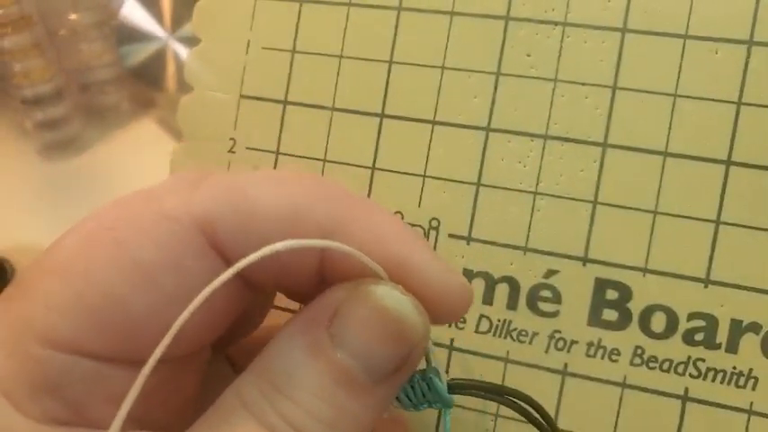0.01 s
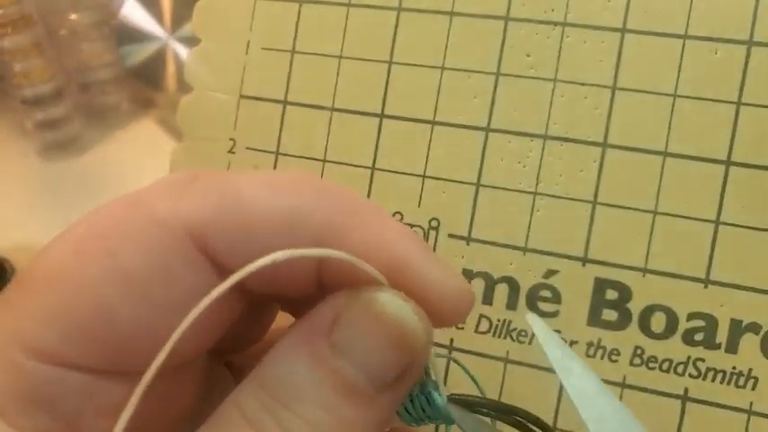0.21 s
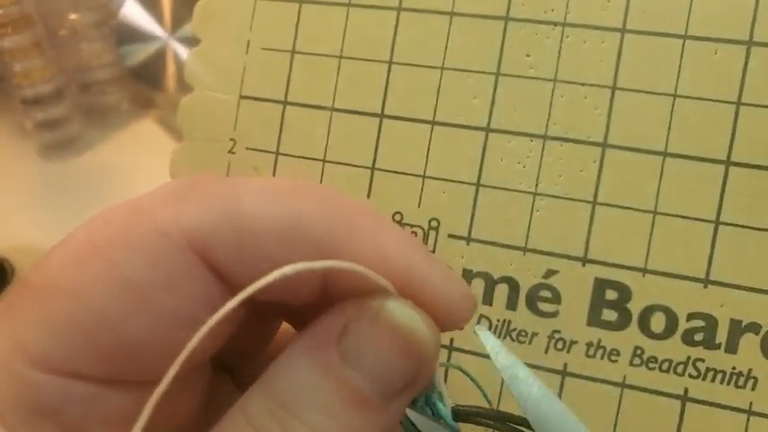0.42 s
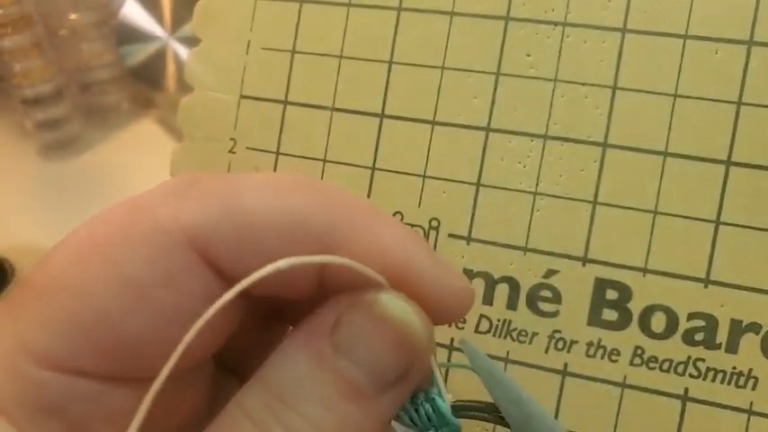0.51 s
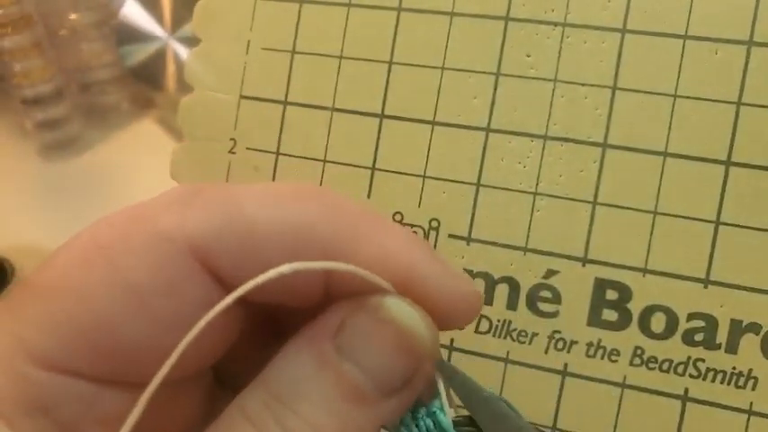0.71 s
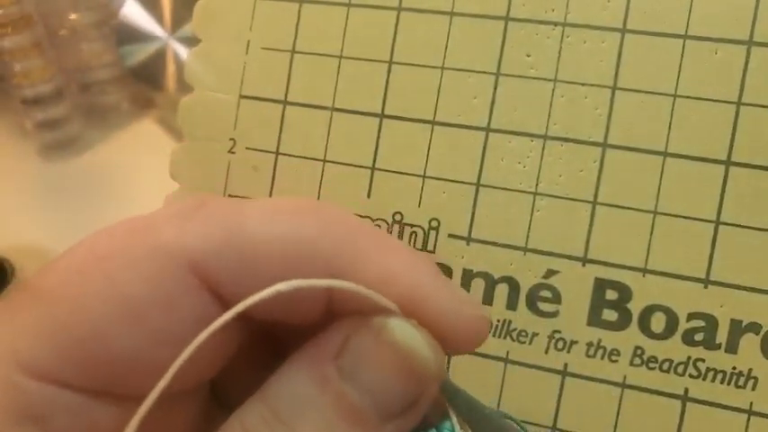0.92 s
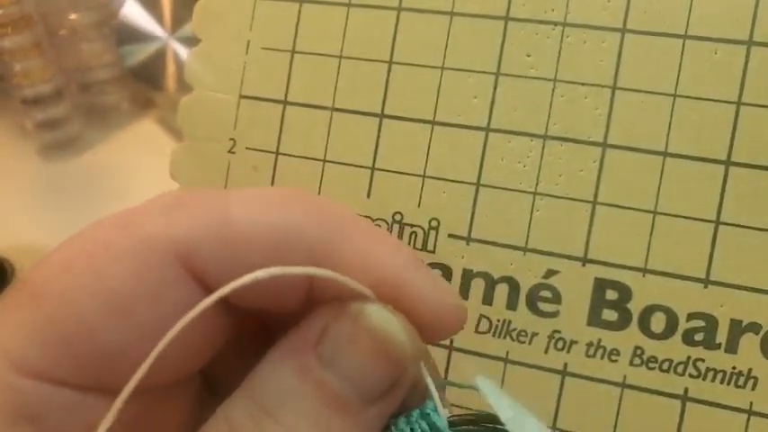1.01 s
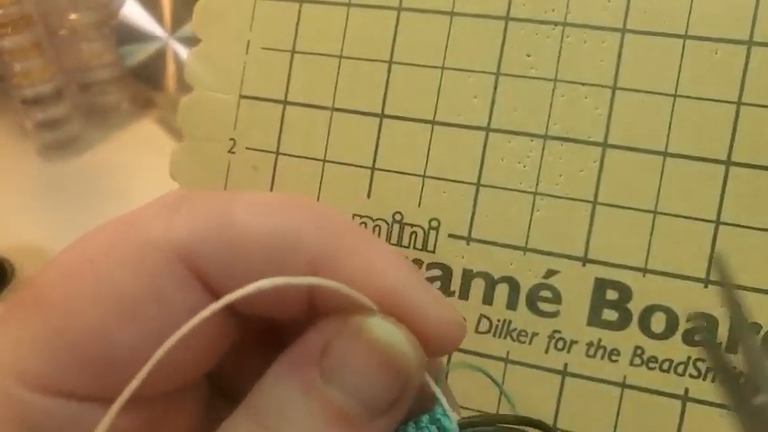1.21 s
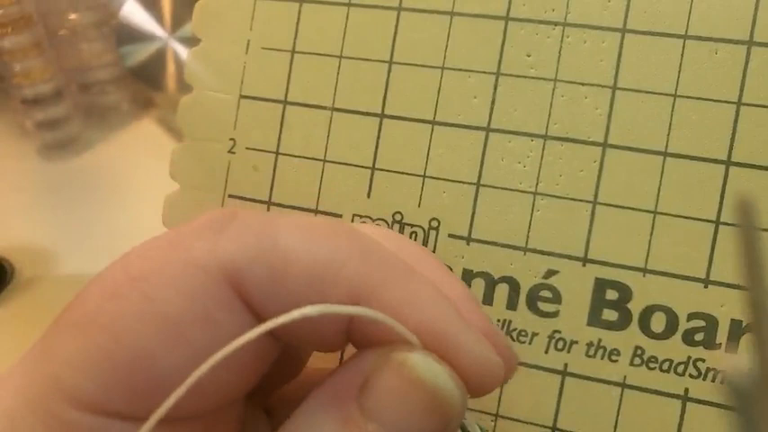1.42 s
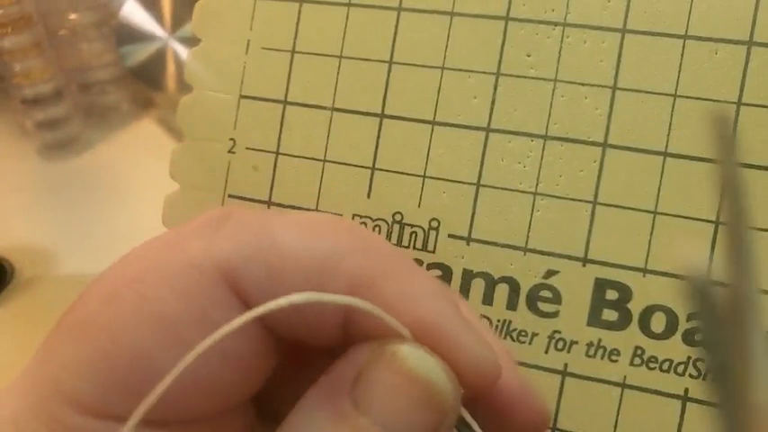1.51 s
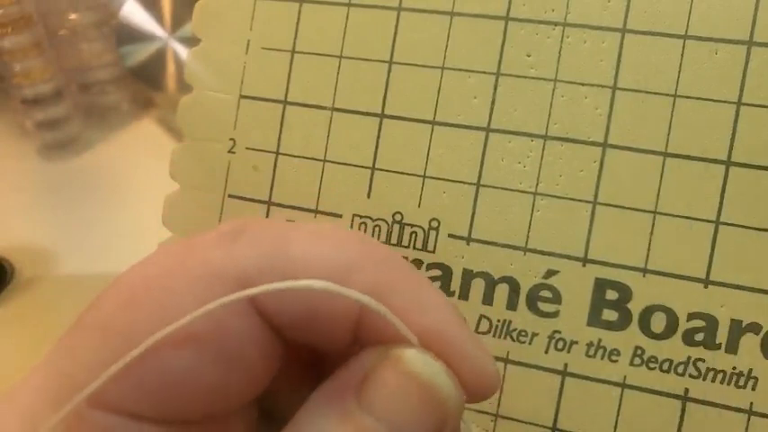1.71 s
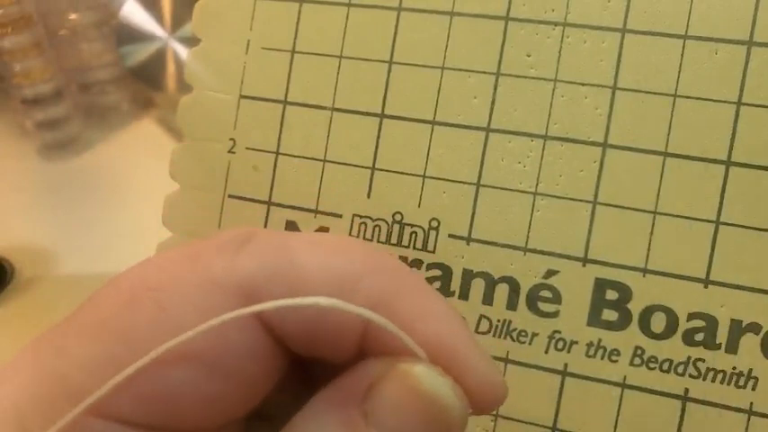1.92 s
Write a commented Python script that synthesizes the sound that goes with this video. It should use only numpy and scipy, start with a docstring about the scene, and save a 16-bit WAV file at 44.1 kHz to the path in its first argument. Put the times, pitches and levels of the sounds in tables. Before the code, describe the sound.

Small scissors snip a thread with one crisp click and a brief metallic ring. Then fingers and scissors tap lightly on a work board, and thread squeaks faintly through fingers, close to the microphone over a small room's low hum.

```python
"""Small scissors snip a thread over a macrame board: the blades rub, snap shut, ring and slide open.
Fingers and scissors tap and bump the board lightly, then the thread sticks and slips through the
fingers in a few short, squeaky rasps. The microphone is close and hisses faintly; behind the
handling, mains hum and a low rumble fill the small room."""
import sys
import numpy as np
from scipy import signal
from scipy.fft import rfft, irfft, next_fast_len
from scipy.io import wavfile

SR = 44100
rng = np.random.default_rng(int(sys.argv[2]) if len(sys.argv) > 2 else 0)


def pcm_store(signal):
    """Save signal as 16-bit PCM."""
    levels = np.round(np.clip(np.atleast_2d(signal), -1, 1) * 32767)
    wavfile.write(sys.argv[1], SR, levels.astype(np.int16).T)


N = 88200

# the blades' bright bite and closing clack, then two dull early echoes from the room:
# start_s, level_db, brightness_hz
SNIP_CRACKS = [(0.207, -30.5, 13000), (0.2086, -30, 10000), (.2107, -21.5, 3350), (0.2174, -32, 2400),
               (0.2288, -42, 2120), (0.241, -42, 2200)]
# ringing modes of the scissors: pitch_hz, level_db, t60_s, pan_db
STEEL_MODES = [(866.3, -10.5, 0.067, -16.5), (1056, -20.5, .05, 8), (1295, -20, 0.068, -1),
               (1603, -6, 0.084, -6.5), (1735, -9.5, 0.045, -9), (1968, -15, 0.074, -4.5),
               (2020, -20.5, 0.072, -1), (2223, -15.5, 0.25, -2), (2273, -5, 0.044, -13),
               (2380, -15.5, 0.065, -5), (2599, -16, .09, -4), (3131, -14, 0.11, 2.5),
               (3855, -13, 0.068, 2.5), (4700, -21, 0.11, 2.5), (5426, -29.5, 0.05, -5),
               (6630, -26.5, .05, 11.5)]
SNIP_START_S = SNIP_CRACKS[0][0]
STEEL_LOW_HZ = 799  # thin steel radiates little bass
THREAD_PAN_DB, HAND_PAN_DB = -5, -8  # left minus right
LEFT_LAG_S = .00009  # close sounds reach the left channel later


def snip():
    """The blades bite and clack shut, setting the steel ringing; the room returns two dull echoes."""
    # spectrum of a crack: frequency_hz, level_db
    crack_spectrum = [(150, -38), (370, -20.5), (560, -41.5), (720, -29.5), (900, -21), (1200, -14),
                      (1600, -5), (2150, 2.5), (2800, -7.5), (3300, -12.5), (3800, -7), (4300, -12.5),
                      (5600, -10.5), (8400, -27), (9300, -55.5), (16000, -69)]
    click_db, grit_db, ring_db = 15, -4, -24.5
    cracks = np.zeros((2, N))
    for start, db, brightness in SNIP_CRACKS:
        colour = [(f, level - 20 * np.log10(1 + (f / brightness) ** 2)) for f, level in crack_spectrum]
        click = np.pad(shortest_click(colour), (round(start * SR), 0))[:N]
        grit = struck(start, t60=.016) * coloured(white(), colour)
        cracks += amp(db) * (amp(click_db) * click + amp(grit_db) * grit)
    ring = sum(amp(db) * pan(side) * mode(hz, t60, SNIP_START_S, attack=.00067)
               for hz, db, t60, side in STEEL_MODES)
    ring = filtered(ring, lambda f: low_cut(f, STEEL_LOW_HZ))
    return left_late(pan(-8.5) * cracks) + amp(ring_db) * ring


def knock():
    """The snip jolts hand and board into a soft, low thud."""
    return amp(-58) * pan(HAND_PAN_DB) * mode(hz=366, t60=.039, start=SNIP_START_S, attack=.0016)


def blade_slides():
    """Friction between the blades softly excites the steel's modes."""
    # centre_s, half_length_s, level_db, brightness_hz
    strokes = [(0.059, 0.005, -67.5, 2110), (0.081, 0.0084, -58, 1690), (0.473, 0.015, -67.5, 1000),
               (0.536, 0.017, -72.5, 885), (0.568, 0.011, -62, 900), (0.61, 0.027, -70.5, 856),
               (0.699, 0.01, -64, 960)]
    longest_t60_s = .11  # sliding blades damp each other

    def steel(f):
        resonances = sum(
            amp(db) * pan(side) / (1 + 2j * np.pi * (f - hz) * min(t60, longest_t60_s) / np.log(1000))
            for hz, db, t60, side in STEEL_MODES)
        return low_cut(f, STEEL_LOW_HZ) * resonances

    ring = filtered(white()[0], steel)
    out = np.zeros((2, N))
    for centre, half, db, hz in strokes:
        rub = unit(filtered(ring, lambda f: focus(f, hz, octaves=.69) ** 2))
        out += amp(db) * swell(centre, half) * rub
    return out


def board_taps():
    """Soft touches ring the board with a short scuff; each loads it a little differently."""
    # start_s, level_db, centre_hz, pan_db, attack_s
    touches = [(.078, -55, 1054, -8.5, 0.0027), (.642, -51.5, 347, -12.5, 0.0011),
               (1.267, -58, 1940, 1, 0.0022), (1.272, -55, 280, -13, .002), (1.299, -55, 1970, 6, 0.0093),
               (1.328, -57.5, 1200, -8.5, 0.00074), (1.370, -57.5, 1500, -9, 0.0014),
               (1.379, -56.5, 260, -3, .002), (1.497, -60, 2250, 14, 0.0031),
               (1.573, -50.5, 1810, -6, 0.0071), (1.583, -44.5, 265, 0.5, 0.0022),
               (1.608, -52, 1370, -9.5, 0.0031), (1.626, -41.5, 1040, -9.5, 0.0019),
               (1.646, -51, 1760, -3, .003), (1.926, -51.5, 1510, -11, 0.0033)]
    # ringing modes of the board: pitch_hz, level_db, t60_s
    board_modes = [(256.3, -6, 0.096), (310, -5, 0.12), (464, -6, 0.071), (868, -5, 0.1),
                   (940, -6.5, 0.042), (1110, -2, 0.051), (1240, -9, 0.068), (1720, -0.5, 0.036),
                   (1949, -1, 0.07), (2356, -6.5, .05)]
    # frequency_hz, level_db
    scuff_spectrum = [(200, 17), (400, -10), (650, -20), (1000, -8), (2000, -10), (2700, -2), (5000, 0),
                      (9000, -15)]
    octaves, detune_share, spread_db, scuff_db = .59, .014, 2, -13.5
    hz, level, t60 = np.transpose(board_modes)
    out = np.zeros((2, N))
    for start, db, centre, side, attack in touches:
        detune, spread = rng.standard_normal((2, len(board_modes)))
        pitches = hz * (1 + detune_share * detune)
        weights = amp(level + spread_db * spread) * focus(hz, centre, octaves)
        weights /= np.linalg.norm(weights)
        ring = sum(w * mode(f, decay, start, attack) for w, f, decay in zip(weights, pitches, t60))
        noise = filtered(white(), lambda f: amp(along(scuff_spectrum, f)) * focus(f, centre, octaves))
        scuff = amp(scuff_db) * struck(start, t60=.035, attack=attack) * unit(noise)
        out += amp(db) * pan(side) * (ring + scuff)
    return out


def thread_pulls():
    """Fibres stick and slip through the fingers in dense grains; a tight pull rasps over a wider band."""
    # centre_s, half_length_s, level_db, sharp_share
    pulls = [(1.708, 0.0043, -68, 0.4), (1.728, 0.0068, -57, 0.15), (1.742, 0.0014, -63, 0.1),
             (1.751, 0.0023, -59, 0.1), (1.775, 0.00082, -58, 0.1), (1.786, 0.06, -74.5, 0.2),
             (1.824, 0.0023, -61.5, 0), (1.837, 0.0048, -64, 0), (1.858, .009, -51, 0.7),
             (1.882, 0.008, -48, 0.8), (1.903, 0.0008, -47, 0.94), (1.907, 0.01, -62.5, 1)]
    # a gentle pull: frequency_hz, level_db
    soft_spectrum = [(300, -24), (850, -15), (1200, -4), (1500, -13), (1850, 0), (2200, -19), (2850, -6.5),
                     (3200, -18), (3720, 5.5), (4050, -6), (4420, 9.5), (5100, -11), (5800, -34),
                     (16000, -37)]
    # a tight pull: frequency_hz, level_db
    sharp_spectrum = [(350, -43), (950, -14), (1300, -13), (1550, -16), (1790, 3), (2150, -16.5), (2640, 0),
                      (3130, -15), (3680, -4), (4030, -9), (5740, -6), (6150, -22), (6850, -14.5),
                      (8500, -35), (12800, -22), (15500, -30)]
    # one tiny fibre tick: start_s, level_db
    fibre_ticks = [(1.128, -59.5)]
    # frequency_hz, level_db
    tick_spectrum = [(1000, -23.5), (4500, 3.5), (7000, 7.5), (9000, -8), (13000, 1), (16000, -6)]
    slips_per_s = 9000
    slipping = rng.random(N) < slips_per_s / SR
    slip_db = np.clip(rng.standard_normal(N), -2, 2)
    slips = slipping * amp(slip_db) * rng.choice([-1, 1], (2, N))
    soft, sharp = coloured(slips, soft_spectrum), coloured(slips, sharp_spectrum)
    rasps = sum(amp(db) * swell(centre, half) * unit((1 - share) * soft + share * sharp)
                for centre, half, db, share in pulls)
    tick_envelope = sum(amp(db) * struck(start, t60=.0395) for start, db in fibre_ticks)
    tick = tick_envelope * coloured(white(), tick_spectrum)
    return pan(THREAD_PAN_DB) * (rasps + tick)


def slip_squeaks():
    """Blade and thread squeak as they slip."""
    # centre_s, half_length_s, level_db, pitch_hz, rise_hz_per_s
    squeaks = [(.067, 0.0081, -59, 1648, 2), (1.728, 0.0062, -58, 2555, 13001),
               (1.751, 0.0027, -63, 2890, 6000), (1.858, 0.011, -57, 3700, 0),
               (1.881, 0.0076, -50, 3650, 1998)]
    return pan(THREAD_PAN_DB) * stick_slip(squeaks, jitter_hz=59.5)


def skin_groans():
    """Skin judders on the board in short, low tones."""
    # centre_s, half_length_s, level_db, pitch_hz, rise_hz_per_s
    judders = [(1.488, 0.0094, -63, 324, 0.5), (1.53, 0.011, -64, 333, 0), (1.577, 0.024, -58.5, 326, -400)]
    return pan(HAND_PAN_DB) * stick_slip(judders, jitter_hz=12)


def thread_glides():
    """Thread gliding slowly along a blade gives a faint, narrow hiss."""
    # centre_s, half_length_s, level_db, centre_hz
    glides = [(0.906, 0.073, -77, 5074), (0.947, 0.14, -76.5, 4120)]
    out = np.zeros((2, N))
    for centre, half, db, hz in glides:
        hiss = unit(filtered(white(), lambda f: focus(f, hz, octaves=.082)))
        out += amp(db) * swell(centre, half) * hiss
    return out


def hand_rustle():
    """Hands shifting on the board give a dull rustle."""
    # time_s, level_db
    level_curve = [(0, -79.5), (.55, -77), (.95, -66.5), (1.2, -67), (1.42, -75), (1.602, -60), (1.69, -62),
                   (1.78, -68), (2, -72.5)]
    # frequency_hz, level_db
    rustle_spectrum = [(100, -37.5), (200, -10), (260, 2.5), (315, 2), (400, -5.5), (600, -24), (950, -37),
                       (1500, -36.5), (4000, -51.5)]
    level_db = np.interp(np.arange(N) / SR, *np.transpose(level_curve))
    mid, side = coloured(white(), rustle_spectrum)
    return amp(level_db) * pan(HAND_PAN_DB) * unit(np.array([mid + side / 2, mid - side / 2]))


def room(x):
    """The small room's short tail, lasting longest in the middle range."""
    # frequency_hz, t60_s
    decay_times = [(200, 0.083), (2000, 0.22), (5000, 0.2), (10000, .11)]
    # frequency_hz, gain_db
    room_colour = [(300, 4), (900, -3.5), (1500, -1), (1950, -1.5), (2270, 3.5), (2550, -1.5), (3200, 2),
                   (4200, -1), (6000, 2.5)]
    delay_s = .005
    hz, t, spectra = signal.stft(rng.standard_normal((2, SR // 2)), SR, nperseg=256)
    decay = np.exp(-np.log(1000) * t / along(decay_times, hz)[:, None])
    tail = signal.istft(spectra * decay, SR, nperseg=256)[1]
    tail = np.pad(tail / np.linalg.norm(tail[0]), ((0, 0), (int(delay_s * SR), 0)))
    wet = signal.fftconvolve(x.mean(0)[None], tail, axes=1)[:, :N]
    return filtered(wet, lambda f: amp(along(room_colour, f)))


def mains_hum():
    """Steady harmonics of the mains, dead centre."""
    # pitch_hz, rms_db
    harmonics = [(119.8, -62), (239.6, -76.5), (958, -85.5)]
    return sum(amp(db) * np.sqrt(2) * np.sin(2 * np.pi * (hz * since(0) + rng.random()))
               for hz, db in harmonics)


def room_rumble():
    """Low room tone, much the same in both channels."""
    # frequency_hz, level_db
    rumble_spectrum = [(20, -10.5), (38, -0.5), (50, -2.5), (68, 6.5), (90, -1.5), (140, -7.5), (235, -16),
                       (330, -24), (600, -40), (950, -41), (1500, -51.5), (4000, -62)]
    mid, side = coloured(white(), rumble_spectrum)
    return amp(-61) * (mid + amp(-8) * np.array([side, -side]))


def microphone_hiss():
    """The microphone's own faint noise."""
    # frequency_hz, level_db
    hiss_spectrum = [(600, 5), (1000, 10), (4000, 1.5), (7300, 1), (8400, -14), (9800, -11.5), (12000, -3),
                     (15500, -0.5)]
    return amp(-71.5) * pan(-2.5) * coloured(white(), hiss_spectrum)


def stick_slip(strokes, jitter_hz):
    """Regular slipping gives short, unsteady tones."""
    t, out = np.arange(N) / SR, np.zeros(N)
    for centre, half, db, hz, rise in strokes:
        waver = unit(filtered(white()[0], lambda f: f < hz / 10))
        pitch = hz + rise * (t - centre) + jitter_hz * waver
        out += amp(db) * swell(centre, half) * np.sqrt(2) * np.sin(2 * np.pi * np.cumsum(pitch) / SR)
    return out


def mode(hz, t60, start, attack):
    """One decaying stereo ring, its phase lagging on the left."""
    t = since(start) - LEFT_LAG_S * np.array([[1], [0]])
    return struck(start, t60, attack) * np.sin(2 * np.pi * (hz * t + rng.random()))


def shortest_click(spectrum):
    """A minimum-phase click with the given spectrum, of energy 1."""
    cepstrum = irfft(np.log(amp(along(spectrum, np.fft.rfftfreq(N, 1 / SR)))), N)
    fold = 2 * (np.arange(N) < N // 2) - (np.arange(N) == 0)
    click = irfft(np.exp(rfft(cepstrum * fold)), N)
    return click / np.linalg.norm(click)


def struck(start, t60, attack=.00042):
    """Envelope of a blow; times in seconds."""
    t = since(start)
    return (1 - np.exp(-t / attack)) * np.exp(-np.log(1000) * t / t60)


def swell(centre, half):
    """Bell-shaped envelope of a stroke; times in seconds."""
    return np.exp(-.5 * ((np.arange(N) / SR - centre) / half) ** 2)


def since(start):
    """Seconds since start, zero before."""
    return np.maximum(np.arange(N) / SR - start, 0)


def focus(hz, centre, octaves):
    """A contact favours the frequencies around its centre."""
    return 1 / (1 + (np.log2((hz + 1) / centre) / octaves) ** 2)


def low_cut(f, hz, order=6):
    """A steep causal high-pass response."""
    return signal.freqs(*signal.butter(order, 1, "high", analog=True), worN=f / hz)[1]


def left_late(x):
    """x with the left channel slightly delayed."""
    return filtered(x, lambda f: np.exp(-2j * np.pi * f * LEFT_LAG_S * np.array([[1], [0]])))


def pan(db):
    """Stereo gains with the left louder by db."""
    return amp(np.array([[db], [-db]]) / 2)


def white():
    """Two unrelated white noises."""
    return rng.standard_normal((2, N))


def coloured(x, spectrum):
    """x shaped by a spectrum, at rms 1."""
    return unit(filtered(x, lambda hz: amp(along(spectrum, hz))))


def filtered(x, response):
    """x through a frequency response."""
    size = next_fast_len(N + SR // 2)
    return irfft(rfft(x, size) * response(np.fft.rfftfreq(size, 1 / SR)), size)[..., :N]


def along(points, hz):
    """Interpolate (frequency_hz, value) points on a log axis."""
    frequencies, values = np.transpose(points)
    return np.interp(np.log(hz + 1), np.log(frequencies + 1), values)


def unit(x):
    """Scale to rms 1."""
    return x / np.sqrt(np.mean(x ** 2) + 1e-30)


def amp(db):
    """Decibels to gain."""
    return 10 ** (np.asarray(db) / 20)


def scene():
    """Scissors, board and thread up close, with a little room behind them."""
    squeaks, groans = slip_squeaks(), skin_groans()
    cut = snip()
    handling = blade_slides() + board_taps() + thread_glides() + groans
    pulling = thread_pulls() + squeaks
    echo = room(amp(-10) * (cut + handling) + amp(-12.5) * pulling)
    rustle = hand_rustle()
    background = mains_hum() + room_rumble() + microphone_hiss()
    return cut + knock() + handling + pulling + rustle + echo + background


def record(dry):
    """The recorder keeps nothing above its band limit."""
    top_hz = 15820
    return filtered(dry, lambda hz: hz < top_hz)


dry = scene()
out = record(dry)
pcm_store(out)
```